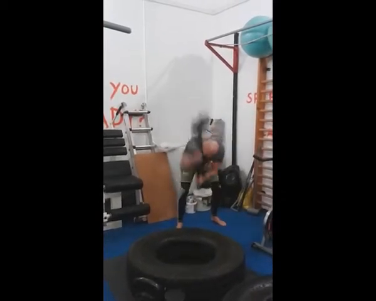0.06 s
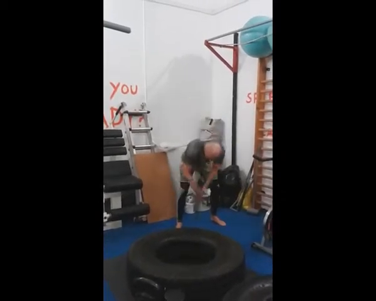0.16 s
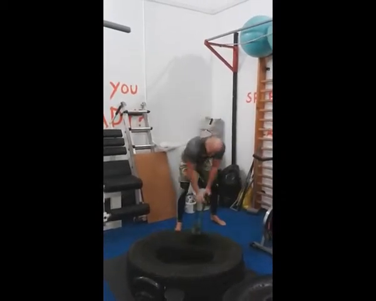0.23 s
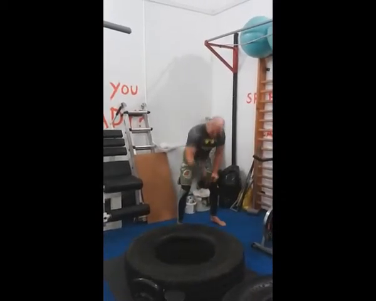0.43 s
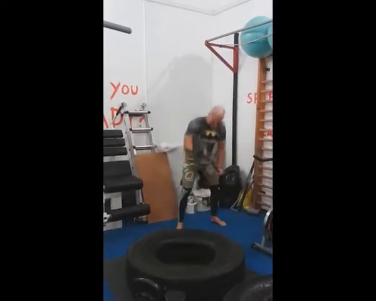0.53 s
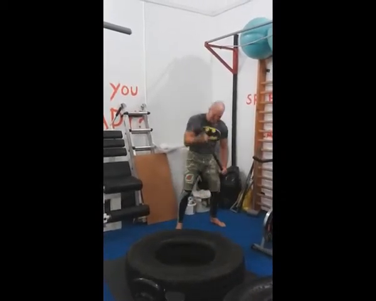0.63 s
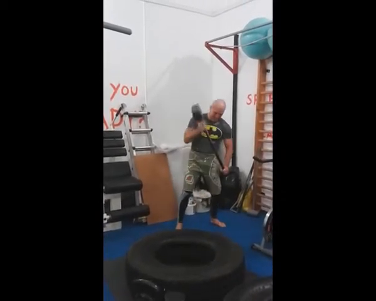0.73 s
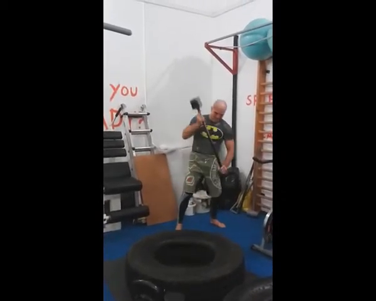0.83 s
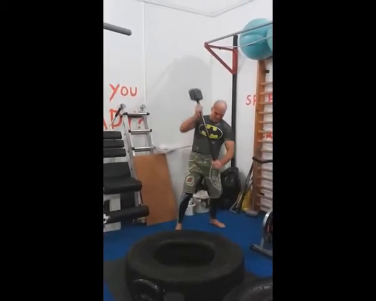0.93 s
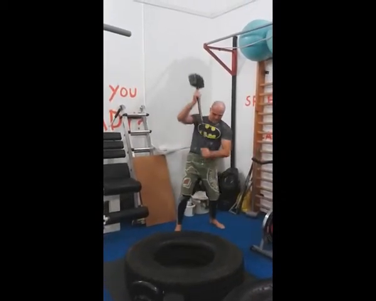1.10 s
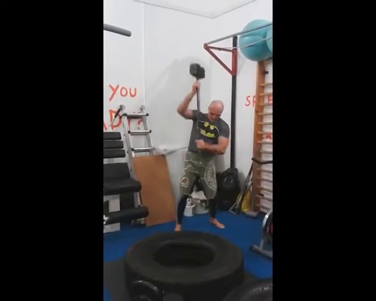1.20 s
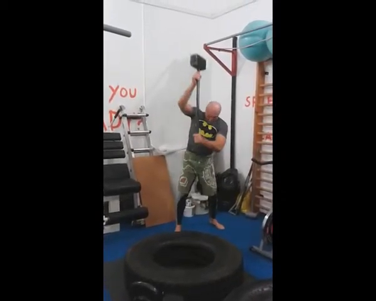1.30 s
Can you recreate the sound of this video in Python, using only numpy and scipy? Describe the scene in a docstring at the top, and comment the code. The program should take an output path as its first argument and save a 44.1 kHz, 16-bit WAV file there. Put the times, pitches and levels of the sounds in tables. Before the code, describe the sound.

A sledgehammer swishes down briefly and hits a large tire at about 0.2 seconds with a sharp crack and a deep boom. The tire bucks against the floor, then settles in softer bumps around 0.5 and 0.65 seconds, faintly rattling loose gear. The small gym rings and fades over about a second, with tiny bumps near 0.9 and 1.3 seconds above a quiet rumble, hum and hiss.

```python
"""A sledgehammer hits a tractor tyre lying in a small gym with hard walls.
The steel head swishes down and slaps the rubber with a sharp crack. The tyre booms with many
low notes at once, bucks against the floor and settles in soft bumps that rattle loose gear.
The walls throw the sound back, and the room rings on over a low rumble, a hum and a faint hiss."""
import sys
import numpy as np
from scipy import signal
from scipy.io import wavfile
from scipy.ndimage import uniform_filter1d

SR = 44100
rng = np.random.default_rng(int(sys.argv[2]) if len(sys.argv) > 2 else 0)


def unload_wav(signal):
    """Save mono or channel-first audio to the path in sys.argv[1] as 16-bit WAV at rate SR, clipped to [-1, 1]."""
    wavfile.write(
        sys.argv[1],
        SR,
        np.round(np.clip(np.atleast_2d(signal).T, -1, 1) * 32767).astype(np.int16),
    )


N = 59535
T = np.arange(N) / SR
STRIKE_S = .2122


# Tone colour of the rubber's smack and the first wall reflections: f/Hz, relative level/dB per Hz
SMACK_COLOUR = [(100, -10), (300, -44), (1000, -4), (2800, -12), (5000, -23.5), (9100, -29), (14800, -29)]
# Echoes of the crack off floor, walls and ceiling: delay/s, relative level/dB
CRACK_ECHOES = [(0.0134, -27), (0.0187, -31), (0.0193, -3.5), (0.0228, -15), (0.023, -23)]
def hammer_slap():
    """Steel hits rubber: a crack and its echoes, while the tyre's side caves in and springs back."""
    spike_s = .000083  # half the width of the first jump in air pressure
    spike = from_db(-9.5) * swell(2 * spike_s, spike_s)
    ping_hz, width_hz = 2740, 420
    ping = from_db(-15.5) * np.sin(2 * np.pi * ping_hz * T) * np.exp(-np.pi * width_hz * T)
    smack = from_db(-56) * noise(SMACK_COLOUR) * fade(.023)
    crack = spike + ping + smack
    echoes = sum(from_db(db) * at(delay, crack) for delay, db in CRACK_ECHOES)
    dent = from_db(-4.5) * at(2 * spike_s, low_cut(ring(hz=210, fade_s=.02)))
    return crack + echoes - dent


# The natural notes of the tyre and the air around it: f/Hz, relative level/dB, fade time/s
TYRE_NOTES = [(81, -33, 1.6), (98, -24, 1.3), (113.5, -20, 1.35), (126, -21, .7), (160.5, -21, .9),
              (193.5, -15, .9), (224.5, -16, .85), (268, -23, .8), (287, -23, 1.0), (321, -24, 1.1),
              (357, -20, .7), (391, -22, .9), (429, -27, .8), (570, -27, .7), (610, -28, .9),
              (682.5, -27, .8), (757, -29, .9), (793, -25, .8), (846, -29, .9), (890.5, -27, 1.0),
              (957, -32, 1.0), (1095, -34, .9), (1534, -37, .9)]
def tyre_boom():
    """The blow sets all the tyre's notes ringing; every second one starts the opposite way."""
    notes = sum((-1) ** k * from_db(db) * ring(hz, fade_s)
                for k, (hz, db, fade_s) in enumerate(TYRE_NOTES))
    return from_db(1) * build(.022) * notes


# The tyre's bumps on the floor: t/s, level/dB, f/Hz, fade time/s
TYRE_BUMPS = [(0.2322, -5, 288, 0.098), (0.2493, -4.5, 151.6, 0.093), (.2785, -6, 578, 0.041),
              (.281, -3.5, 210, 0.049), (0.485, -18.5, 118.6, 0.22), (.505, -18.5, 227, 0.045),
              (0.642, -18.5, 192.2, 0.17), (0.689, -26.5, 288, .12), (.925, -31.5, 118, 0.14),
              (1.298, -30.5, 140, 0.087)]
def tyre_bumps():
    """The tyre bucks and settles. Each dull thump dies fast and leaves the room ringing a little."""
    thumps = sum(from_db(db) * at(s, ring(hz, fade_s) * build(.5 / hz))
                 for s, db, hz, fade_s in TYRE_BUMPS)
    thumps = low_cut(thumps)
    tail = room_ring()
    echoes = signal.fftconvolve(thumps, tail / np.sqrt(np.sum(tail ** 2)))[:N]
    return thumps + from_db(-22.5) * echoes


# Tone colour of the air rushing round the hammer head: f/Hz, relative level/dB per Hz
SWISH_COLOUR = [(40, -39), (110, -1), (250, -4), (480, -6), (750, -11), (1100, -4), (1600, -17),
                (2000, -27), (3000, -16), (4200, -55)]
# Whistles in the swish: f/Hz, width/Hz, level at the strike/dB
SWISH_WHISTLES = [(658, 29, -33), (813, 77, -34.5), (1537, 110, -40)]
# Faint whistles early in the swing: f/Hz, width/Hz, level at their loudest/dB
FAINT_WHISTLES = [(418.3, 2.9, -56), (1267, 72, -60)]
def hammer_swish():
    """The rush of air grows as the head speeds up and stops when it lands."""
    rise_db_per_s, stop_s = 359, .012
    rise = from_db(-rise_db_per_s * np.maximum(STRIKE_S - T, 0))
    stop = np.exp(-np.maximum(T - STRIKE_S, 0) / stop_s)
    faint = whistles(FAINT_WHISTLES) * swell(peak_s=.13, spread_s=.051)
    treble_cut = signal.butter(8, 3520, fs=SR, output="sos")
    air = from_db(-63) * signal.sosfilt(treble_cut, noise(SWISH_COLOUR))
    return rise * stop * (air + whistles(SWISH_WHISTLES)) + faint


def wall_reflections():
    """The nearest walls send the blow back first, as a short burst of noise."""
    burst = noise(SMACK_COLOUR) * build(.0045) * fade(.11)
    return from_db(-49) * at(.011, burst)


# How the gym rings at each pitch: f/Hz, relative level/dB per Hz, fade time/s
ROOM_RING = [(35, -18, 1.4), (66.6, -26, 5.4), (108, 3.5, 1.04), (267, -3.5, 1.55), (513, -11, 1.63),
             (704, -7, 1.355), (1210, -16.5, 1.446), (2050, -23, 1.07), (2503, -20, 1.014),
             (3760, -28, 0.64), (7100, -40, 0.49), (10500, -42, 0.43), (14500, -44.5, 0.4)]
def room_ring():
    """Countless echoes blur into one wash of sound, in which the highs die first."""
    wash = sum(band * fade(at_hz(ROOM_RING, hz, column=2)) for hz, band in bands(ROOM_RING))
    return build(.012) * wash


# Tone colour of the loose gear: f/Hz, relative level/dB per Hz
RATTLE_COLOUR = [(200, -28), (500, -11), (1100, 4.5), (2600, -6.5), (4700, -22.5), (7000, -42),
                 (15000, -60)]
# Rattles as the tyre lands: t/s, relative level/dB
GEAR_RATTLES = [(.503, -73.5), (.645, -84)]
def gear_rattles():
    """The floor shakes loose gear into short, faint clatters."""
    clatter = noise(RATTLE_COLOUR)
    burst = build(.004) * fade(.23)
    return sum(from_db(db) * clatter * at(s, burst) for s, db in GEAR_RATTLES)


# Tone colour of the quiet room: f/Hz, relative level/dB per Hz
BACKGROUND_COLOUR = [(30, -46), (60, -15.5), (95, -2.5), (135, 2), (200, -21), (285, -14.5), (370, -30.5),
                     (450, -22.5), (800, -32), (1500, -30), (2300, -41.5), (4000, -47), (8000, -49),
                     (15000, -49.5)]
def background():
    """Steady rumble and hiss, with a low hum that swells as the boom dies."""
    hum_hz = 128.8
    hum = from_db(-38) * np.sin(2 * np.pi * hum_hz * T) * swell(peak_s=1.11, spread_s=.23)
    return from_db(-63.5) * noise(BACKGROUND_COLOUR) + hum


def from_db(db):
    """Turn decibels into a number to multiply a sound by."""
    return 10 ** (np.asarray(db) / 20)


def fade(fade_s):
    """Die away, dropping 60 dB over the fade time."""
    return np.exp(-np.log(1000) * T / fade_s)


def build(seconds):
    """Rise smoothly from silence."""
    return 1 - np.exp(-T / seconds)


def swell(peak_s, spread_s):
    """Rise and fall in a bell shape."""
    return np.exp(-((T - peak_s) / spread_s) ** 2 / 2)


def at(s, x):
    """Delay a sound by s seconds."""
    return np.interp(T - s, T, x, left=0)


def ring(hz, fade_s):
    """A pure note that is struck and dies away."""
    return np.sin(2 * np.pi * hz * T) * fade(fade_s)


def low_cut(x, hz=70):
    """Take away the deepest bass, below about 70 Hz."""
    return signal.sosfilt(signal.butter(2, hz, "high", fs=SR, output="sos"), x)


def at_hz(table, hz, column=1):
    """Look up a pitch in a table, blending between its rows."""
    table = np.array(table)
    return np.interp(np.log(hz), np.log(table[:, 0]), table[:, column])


def bands(colour):
    """Split noise into slices a third of an octave wide; give each one's middle pitch and sound."""
    hz = np.arange(N) * SR / N + 1e-3
    white = np.fft.fft(rng.standard_normal(N)) * (hz < SR / 2)
    for centre in 25 * 2 ** (np.arange(29) / 3):
        shape = np.cos(np.pi / 2 * np.clip(3 * np.log2(hz / centre), -1, 1))
        band = even_out(np.fft.ifft(white * shape), size=3000, mode="wrap")
        width_hz = .23 * centre
        yield centre, band * np.sqrt(width_hz) * from_db(at_hz(colour, centre))


def noise(colour):
    """Steady noise with a given tone colour, its mix of lows and highs."""
    return sum(band for _, band in bands(colour))


def whistles(rows):
    """Breathy tones, made by letting noise ring around single pitches."""
    out = 0
    for hz, width, db in rows:
        pole = np.exp((2j * hz - width) * np.pi / SR)
        tone = signal.lfilter([1], np.poly([pole, pole]), rng.standard_normal(2 * N))[N:]
        out = out + from_db(db) * even_out(tone, size=2000)
    return out


def even_out(x, size, mode="reflect"):
    """Steady a noise by dividing it by its average strength over size samples."""
    return x.real / np.sqrt(uniform_filter1d(abs(x) ** 2, size=size, mode=mode) / 2)


def scene():
    """One swing of the hammer, in mono."""
    swing = hammer_swish()
    blow = wall_reflections() + hammer_slap() + tyre_boom() + from_db(-42) * room_ring()
    return (swing + at(STRIKE_S, blow) + tyre_bumps() + gear_rattles() + background())[None]


def record(dry):
    """Flatten the tallest peaks and cut the very highest pitches."""
    ceiling, top_hz = .76, 15500
    flattened = dry / (1 + (dry / ceiling) ** 8) ** (1 / 8)
    return signal.sosfilt(signal.ellip(10, .1, 80, top_hz, fs=SR, output="sos"), flattened)


dry = scene()
out = record(dry)
unload_wav(out)
```